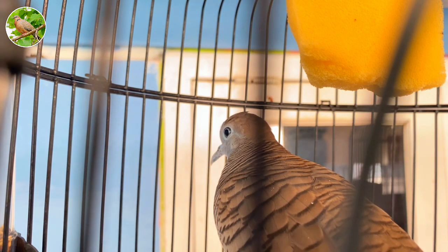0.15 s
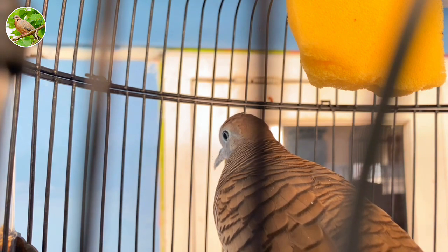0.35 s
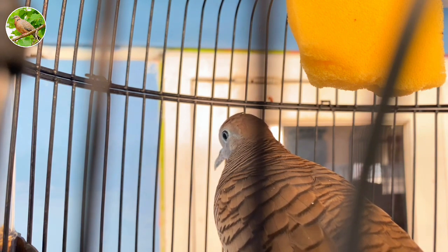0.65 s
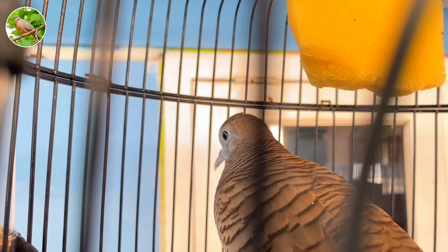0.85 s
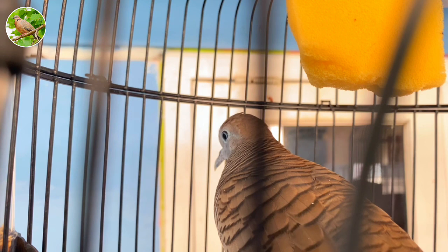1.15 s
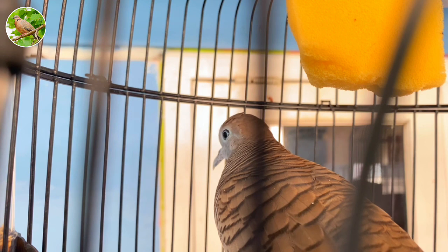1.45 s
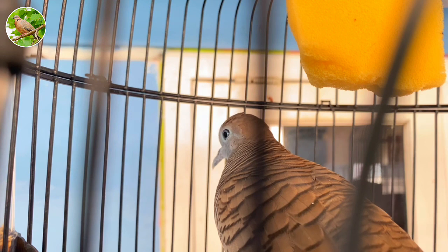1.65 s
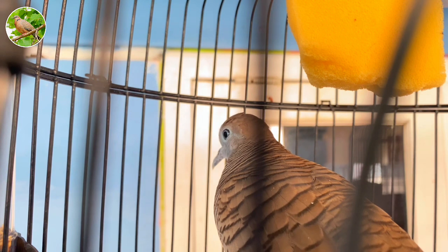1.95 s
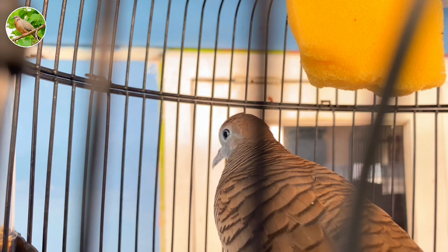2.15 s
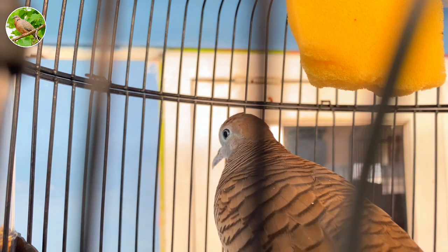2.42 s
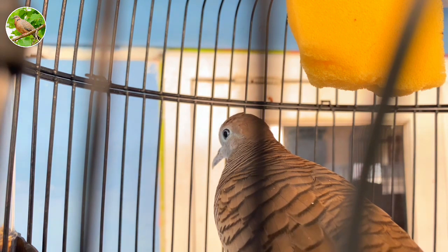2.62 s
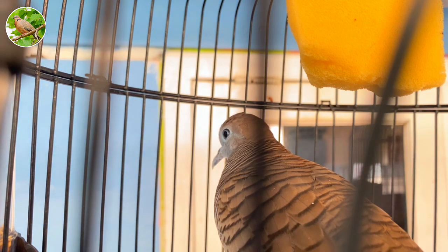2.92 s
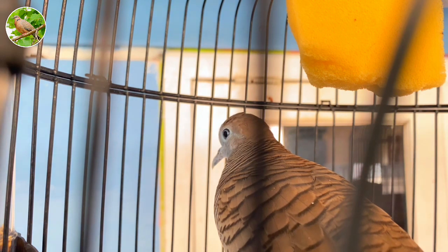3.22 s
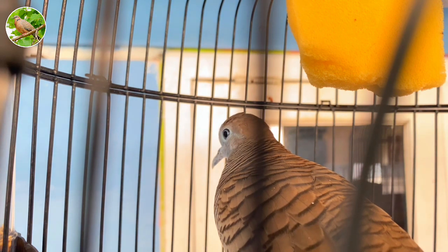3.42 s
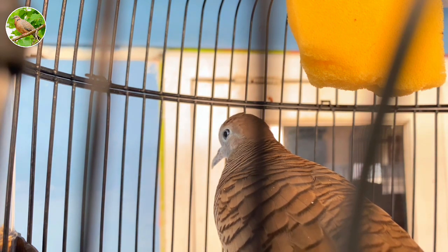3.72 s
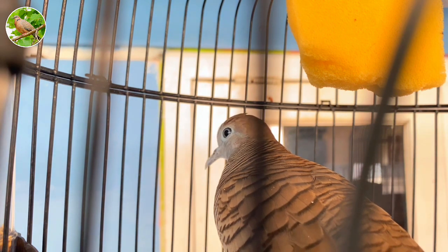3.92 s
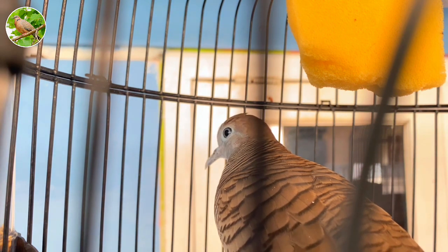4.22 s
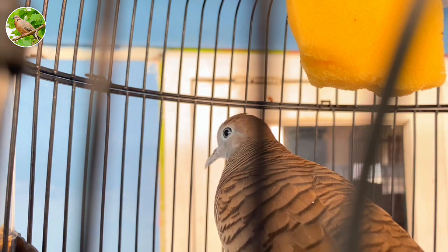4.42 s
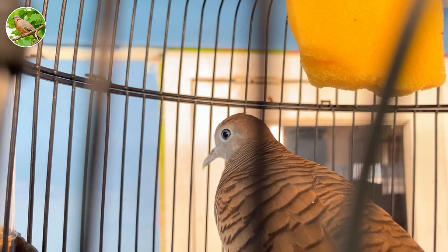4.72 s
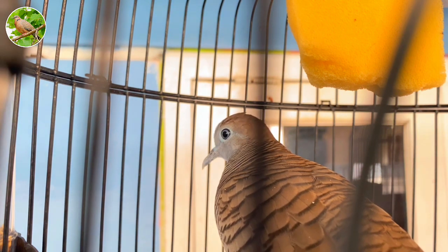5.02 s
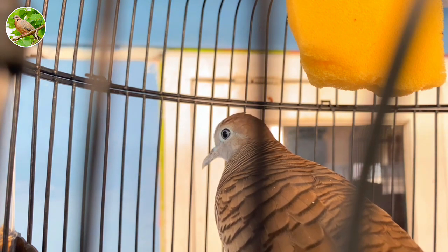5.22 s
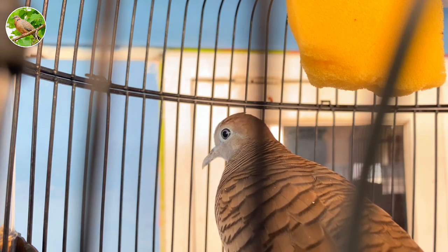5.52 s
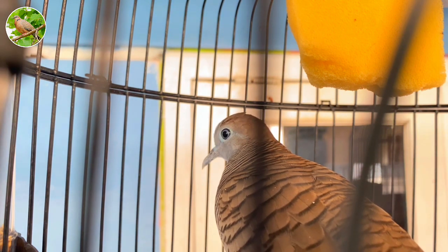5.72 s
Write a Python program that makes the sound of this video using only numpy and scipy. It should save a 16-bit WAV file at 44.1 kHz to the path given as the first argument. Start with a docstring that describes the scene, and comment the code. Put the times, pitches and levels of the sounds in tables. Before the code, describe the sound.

Low street hum surrounds two close doves. First come faint echoing far calls, then a loud, fast cooing roll slightly left. After a gap with distant pips and tiny wire ticks, a drier, quieter dove coos in front. Another pause holds a barely audible bird whistle before both coo together, the loudest peaks slightly overloaded.

```python
"""First a street hum with hiss and insects, and far doves calling; then two caged doves coo close by.
The loud dove sits left under an eave that throws its notes back; the softer one is dry and in front.
Coos are gliding near-sines whose overtones flare as the register flips; hoarse catches are throat pulses.
Far doves are rising tones mostly heard as echo, with level pips; a small bird whistles faintly.
The street is shaped noise; cage-wire ticks are ringing noise bursts and bumps are short low sines."""
import sys
import numpy as np
from scipy import signal
from scipy.fft import rfft, irfft
from scipy.io import wavfile
from scipy.ndimage import uniform_filter1d

SR = 44100
rng = np.random.default_rng(int(sys.argv[2]) if len(sys.argv) > 2 else 0)


def generate_wav(sig):
    """Save sig (samples, or channels by samples) to the path in sys.argv[1] as 16-bit PCM at SR."""
    pcm = np.round(np.clip(np.atleast_2d(sig).T, -1, 1) * 32767).astype(np.int16)
    wavfile.write(sys.argv[1], SR, pcm)


N = 258426

# Street, all round: start_s, hum_db, hiss_db, insects_db
STREET_LEVELS = [(0.0, -35, -52, -91), (0.591, -35.5, -53, -93.5), (0.88, -40, -52, -76),
                 (1.601, -35.5, -51.5, -72.5), (1.989, -36, -50.5, -66), (2.27, -36, -48.5, -70),
                 (2.69, -34.5, -50, -68), (3.31, -35, -49, -67.5), (3.74, -35.5, -49, -75),
                 (4.32, -34, -50, -71), (5.32, -35, -50, -68.5), (5.52, -39.5, -49.5, -65),
                 (5.86, -39, -52, -72)]
# Relative density of the hum and of the hiss: frequency_hz, density_db (per Hz)
HUM_SPECTRUM = [(15, -30.5), (25, -18), (35, -12), (47, -22), (70, -7.5), (95, -9), (125, 2), (150, -7),
                (183, -1.5), (215, -12.5), (300, -13.5), (400, -17.5), (660, -32), (1000, -64)]
HISS_SPECTRUM = [(290, -20), (500, -1.5), (737, -1), (1170, -4), (1310, -5.5), (1410, -7), (1530, -7),
                 (2330, -12.5), (2650, -16), (3100, -18.5), (5130, -30), (6640, -29), (9110, -42),
                 (12000, -38.5), (15500, -42.5)]
# Insect bands: centre_hz, width_hz, relative_level_db
INSECT_BANDS = [(4250, 350, -1.5), (5780, 270, -1), (6620, 1400, 3.5), (7240, 610, -0.5)]
# Stereo width of the street: frequency_hz, side_against_mid_db
STREET_WIDTH = [(60, -27.5), (300, -30), (800, -23.5), (2700, -20), (4200, -22), (7600, -20), (8600, -2.5),
                (10500, -4), (15000, -11.5)]
# Small bird far away: start_s, pitch_hz, level_db
WHISTLE_PATH = [(4.6, 4350, -90), (4.64, 4400, -70), (4.75, 4200, -76), (4.95, 4200, -75), (5.1, 4500, -72),
                (5.16, 4400, -90)]

# Far dove, before echo and distance loss: start_s, level_db, length_s
FAR_CALLS = [(0.056, -31.5, 0.052), (0.271, -32, .045), (0.49, -31.5, .045), (0.716, -31.5, 0.05),
             (1.435, -31.5, 0.038)]
FAR_LOW_HZ, FAR_RISE_HZ = 981, 388
# Still farther dove on one pitch, also heard faintly in the echo: start_s, level_db
FAR_PIPS = [(1.59, -51), (1.80, -50), (2.01, -51), (2.22, -49), (2.44, -52), (2.66, -49), (2.87, -52),
            (3.29, -53)]

# Cage wire: start_s, level_db
WIRE_TICKS = [(2.8908, -55), (3.1063, -60), (3.25, -59), (3.4047, -51), (5.1094, -65.5)]
TICK_HZ = 12000
# Low bumps: start_s, level_db, pitch_hz
LOW_BUMPS = [(1.832, -27.5, 140), (4.507, -23, 114), (5.093, -25.5, 129)]

# Coos, low register then flip up; levels at the dove, before the port gains:
# start_s, flip_after_s, length_s, low_hz, top_hz, start_level_db, flip_level_db, settled_level_db
FRONT_NOTES = [(3.5012, 0.054, 0.21, 1001, 1250, -22, -16.5, -20.5),
               (3.704, 0.02, 0.043, 937, 1086, -20.5, -18.5, -17.5),
               (3.7728, 0.0109, 0.029, 946, 976, -24, -23, -17),
               (3.848, 0.02, 0.041, 988, 1080, -28.5, -14.5, -19.5),
               (3.9422, 0.014, 0.046, 984, 1140, -24, -15, -23),
               (4.0475, 0.0154, 0.061, 980, 1165, -26, -15.5, -19.5),
               (5.3433, 0.045, 0.18, 987, 1254, -21.5, -15.5, -21.5),
               (5.533, 0.0166, 0.0407, 940.5, 1114, -24.5, -22, -19),
               (5.6, 0.012, 0.032, 941, 984, -24.5, -23.5, -17),
               (5.6782, 0.015, 0.051, 944, 1038, -32, -14.5, -33),
               (5.7731, 0.017, 0.0495, 979, 1127, -32, -12.5, -14.5)]
LEFT_NOTES = [(0.7545, 0.012, 0.074, 976, 1244, -12.5, -7.5, -13.5),
              (0.8258, 0.0089, 0.052, 1082, 1218, -23, -10, -9),
              (0.8738, 0.008, 0.05, 1114, 1214, -20, -9.5, -11),
              (0.9318, 0.005, 0.044, 1036, 1182, -14.5, -7, -13),
              (1.0062, 0.0068, 0.042, 985, 1152, -13, -7.5, -12.5),
              (1.0979, 0.0091, 0.052, 954, 1176, -19.5, -6.5, -14.5),
              (1.2115, 0.0095, 0.17, 949, 1218, -12.5, -8, -17),
              (5.4395, 0.024, 0.075, 987, 1255, -9.5, -9, -21.5),
              (5.5157, 0.0057, 0.0426, 1010, 1237, -14, -9, -14.5),
              (5.5608, 0.0077, 0.049, 1071, 1222, -18.5, -9, -11.5),
              (5.6203, 0.0056, 0.042, 995, 1176, -10, -6, -15),
              (5.6932, 0.0071, 0.04, 959, 1155, -15.5, -6.5, -15),
              (5.7855, 0.009, 0.051, 939.5, 1182, -18.5, -7, -15)]
# Hoarse catches before the voice locks in, likewise: start_s, length_s, level_db
FRONT_CATCHES = [(3.484, .016, -28), (3.765, .007, -32), (3.840, 0.0074, -31.5), (3.933, 0.0098, -29),
                 (4.041, 0.0066, -29.5), (5.327, 0.017, -28.5)]
LEFT_CATCHES = [(.7045, .001, -21), (0.7403, .016, -13.5), (0.995, .004, -23), (1.091, .004, -29),
                (1.202, .004, -24), (5.422, .018, -16), (5.773, .004, -23)]
# Overtones against the fundamental, before any dulling of short notes:
# multiple, before_flip_db, at_flip_db, settled_db
FRONT_OVERTONES = [(2, -41, -25, -34.5), (3, -45, -31.5, -45), (4, -51.5, -34.5, -57),
                   (5, -53.5, -42.5, -63), (6, -54.5, -36.5, -65.5), (7, -60, -51, -60),
                   (8, -53.5, -62.5, -79), (9, -79, -50, -74.5), (10, -89.5, -50.5, -79)]
LEFT_OVERTONES = [(2, -38.5, -27.5, -56.5), (3, -54, -35, -60.5), (4, -65, -48, -72.5), (5, -76, -61, -79)]
# Pitch arch after the flip, one row for short notes and one for long:
# top_place (0-1), sink_hz, late_level_db, end_level_db, fall_s, quaver_hz
FRONT_ARCH = [(0.28, 165, -20.3, -27, 0.007, 3), (0.15, 130, -19.5, -21, 0.0053, 41.5)]
LEFT_ARCH = [(.33, 225, -15, -12.5, 0.0088, 0.01), (.14, 190, -10, -15, 0.016, 0.0027)]
# Low register: scoop_hz, patience_s (later flips jump), jump_hz_per_s of further delay
FRONT_LOW = (75, .016, 5000)
LEFT_LOW = (57, .009, 7000)
LONG_S = .1  # longer notes count as long
SLUR_S = .004  # a note this close behind the last takes up its pitch

# The phone's body shades the right microphone port: frequency_hz, gain_db
BODY_SHADE = [(1300, 0), (1900, -7), (3300, -6), (5000, -5.5), (8000, 0)]
EDGE_HZ = 15550  # upper band limit


def amp(db):
    """Decibels to amplitude."""
    return 10 ** (np.asarray(db) / 20)


def evened(x):
    """Scales to an RMS of 1."""
    return x / np.sqrt(np.mean(x ** 2) + 1e-20)


def read(points, hz):
    """Reads a table of frequency and dB, interpolated over log frequency."""
    f, value = np.transpose(points)
    return np.interp(np.log(hz + 1), np.log(f + 1), value)


def add(mix, s, sound):
    """Adds a sound at s seconds, cut off at the end of the mix."""
    part = mix[round(s * SR):][:len(sound)]
    part += sound[:len(part)]


def ring(x, hz, width):
    """A resonance of gain 1 at its centre."""
    return signal.lfilter(*signal.iirpeak(hz, hz / width, SR), x)


def flutter(depth_db, count):
    """A gain that wanders at random over about count samples."""
    wander = rng.standard_normal(N)
    for _ in range(2):
        wander = uniform_filter1d(wander, size=count)
    return amp(depth_db * evened(wander))


def noise(spectrum_db, size, patchy_db, count):
    """Random short-time spectra with level patches count frames long; mid and side by the width table."""
    frames, hz = 4 * N // size + 5, np.fft.rfftfreq(size, 1 / SR)
    a, b, c, d, patches = rng.standard_normal((frames, len(hz), 5)).T
    patches = uniform_filter1d(patches, size=7, axis=0)  # across frequency
    patches = evened(uniform_filter1d(patches, size=count, axis=1))  # across time
    mid = a + 1j * b
    side = (c + 1j * d) * amp(read(STREET_WIDTH, hz))[:, None]
    gain = amp(spectrum_db(hz)[:, None] + patchy_db * patches)
    spectra = np.array([mid + side, mid - side]) * gain
    sound = signal.istft(spectra, nperseg=size, noverlap=3 * size // 4)[1]
    return evened(sound[:, :N])


def insect_spectrum_db(hz):
    """Sums the power of steep-sided insect bands."""
    power = sum(amp(2 * db) / (1 + (2 * (hz - f) / w) ** 4) for f, w, db in INSECT_BANDS)
    return 10 * np.log10(power)


def street():
    """Lumpy hum of distant engines, broad hiss and bands of insects, all from shaped noise."""
    s, *levels = np.transpose(STREET_LEVELS)
    hum_db, hiss_db, insect_db = (np.interp(np.arange(N) / SR, s, c) for c in levels)
    hum = noise(lambda hz: read(HUM_SPECTRUM, hz), size=4096, patchy_db=1.0, count=9)
    hiss = noise(lambda hz: read(HISS_SPECTRUM, hz), size=1024, patchy_db=2.5, count=15)
    hiss = hiss * flutter(0.65, count=1500)
    insects = noise(insect_spectrum_db, size=1024, patchy_db=3.5, count=70) * flutter(1.5, count=1500)
    hum_lean = amp([[.55], [-.55]])  # the hum leans a little to the left
    return amp(hum_db) * hum * hum_lean + amp(hiss_db) * hiss + amp(insect_db) * insects


def whistle():
    """A small bird far away: one faint sine of wavering pitch and level."""
    s, hz, db = np.transpose(WHISTLE_PATH)
    t = np.arange(N) / SR
    turns = np.cumsum(np.interp(t, s, hz) * flutter(.12, count=300)) / SR
    level = amp(np.interp(t, s, db, -200, -200)) * flutter(4.0, count=400)
    return level * np.sin(2 * np.pi * turns)


def echo(x, t60, after):
    """Sparse taps of random sign that die away by 60 dB in t60 seconds, other taps for each ear."""
    t = np.arange(SR // 2) / SR
    signs = rng.choice([-1., 1.], (2, len(t)))
    kept = rng.random((2, len(t))) < .05
    taps = signs * kept * amp(-60 * t / t60) * (t > after)
    return signal.fftconvolve(x[None], taps / np.linalg.norm(taps[0]), axes=1)[:, :N]


def far_doves():
    """Rising sine calls heard mostly as echo, and faint level pips."""
    calls, pips = np.zeros(N), np.zeros(N)
    for s, db, length in FAR_CALLS:
        u = np.arange(0, 1, 1 / (length * SR))
        climb = np.interp(u, [0, .7, 1], [0, 1.08, .45])  # climbs, then drops back
        turns = np.cumsum(FAR_LOW_HZ + FAR_RISE_HZ * climb) / SR
        add(calls, s, amp(db) * signal.windows.tukey(len(u), .3) * np.sin(2 * np.pi * turns))
    t = np.arange(0, .08, 1 / SR)
    for s, db in FAR_PIPS:
        add(pips, s, amp(db) * np.sqrt(2) * np.hanning(len(t)) * np.sin(2 * np.pi * 1290 * t))
    wet = echo(calls + .5 * pips, .22, .001)
    wet *= np.linalg.norm(calls) / np.linalg.norm(wet[0])
    return amp(-14) * calls + pips + wet[0] + .15 * wet  # echo mostly shared by both ears


def knocks():
    """Wire ticks ring for a millisecond or two; bumps are a few soft low cycles."""
    out, t = np.zeros(N), np.arange(0, .05, 1 / SR)
    for s, db in WIRE_TICKS:
        wire = evened(ring(rng.standard_normal(len(t)), TICK_HZ, 4000))
        add(out, s, amp(db) * np.exp(-t / 0.0014) * wire)
    for s, db, hz in LOW_BUMPS:
        add(out, s, amp(db) * np.sin(np.pi * t / .05) ** 2 * np.sin(2 * np.pi * hz * t))
    return out


def shapes(notes, low_rule, arch):
    """Fills in each note's pitch and level points from the dove's habits."""
    scoop_hz, patience, jump = low_rule
    last_s, last_hz = -1, 0
    for s, flip, length, low, top, *levels_db in notes:
        place, sink_hz, late_db, end_db, fall, quaver = arch[int(length > LONG_S)]
        start = last_hz if s - last_s < SLUR_S else low - scoop_hz
        high = min(low + jump * max(flip - patience, 0), top)  # pitch just after the flip
        last_s, last_hz = s + length, top - sink_hz
        yield s, flip, length, start, low, high, top, place, last_hz, *levels_db, late_db, end_db, fall, quaver


def note(row, tones, fade, dull_db):
    """A near-sine from the closed beak; overtones flare at the flip of register and fade."""
    s, flip, length, start, low, high, top, place, end, *levels_db, fall, quaver = row
    t = np.arange(0, length, 1 / SR)
    after, short = length - flip, length <= LONG_S
    u = np.clip((t - flip) / after, 0, 1)
    rise = (top - high) * np.clip(1 - u / place, 0, 1) ** 2
    sink = (top - end) * np.clip((u - place) / (1 - place), 0, 1) ** (2 if short else 1.2)
    wobble = quaver * u * np.cos(2 * np.pi * 27 * (t - length) + 2.16)  # grows as the breath runs out
    hz = np.where(t < flip, start + (low - start) * t / flip, top - rise - sink + wobble)
    hz = uniform_filter1d(hz, size=130, mode="nearest")
    turns = 2 * np.pi * np.cumsum(hz) / SR

    times = [0, flip, flip + min(.008, .3 * after), flip + .6 * after, length]
    edges = np.clip(t / .004, 0, 1) * np.clip((length - t) / fall, 0, 1)
    level = np.sqrt(2) * amp(np.interp(t, times, levels_db)) * edges

    flare = np.exp(-abs(t - flip - .003) / np.where(t < flip + .003, .004, fade))
    flare = flare * np.clip((top - low - 50) / 150, .15, 1)  # a wider flip flares more
    voice = np.sin(turns)
    for k, (_, before_db, flip_db, settled_db) in enumerate(tones, 2):
        calm_db = np.where(t < flip, before_db, settled_db)
        dulling = short * dull_db * (k - 1) * flare  # short notes lose more of each higher overtone
        tone_db = flare * flip_db + (1 - flare) * calm_db - dulling
        voice = voice + amp(tone_db) * np.sin(k * turns)
    return s, level * voice


def dove(notes, catches, tones, fade, dull_db):
    """Notes, and uneven single pulses, tending to grow, that ring the puffed throat."""
    out, t = np.zeros(N), np.arange(0, .012, 1 / SR)
    for row in notes:
        add(out, *note(row, tones, fade, dull_db))
    swell = (t / .0014) ** 2 * np.exp(2 - 2 * t / .0014)
    for s, length, db in catches:
        for at in np.arange(0, length, .0033):
            late, size, hz = rng.uniform([0, .8, 750], [.001, 1.1, 1250])
            strength = amp(db) * np.sqrt(2) * size * (.6 + .5 * at / length)
            add(out, s + at + late, strength * swell * np.sin(2 * np.pi * hz * t))
    return out


def front_dove():
    """The softer dove, dry and central; its overtones linger after each flip."""
    notes = shapes(FRONT_NOTES, FRONT_LOW, FRONT_ARCH)
    return dove(notes, FRONT_CATCHES, FRONT_OVERTONES, fade=.065, dull_db=5)


def left_dove():
    """The loud dove: its sound at the two ports, with the eave's scattered echo."""
    notes = shapes(LEFT_NOTES, LEFT_LOW, LEFT_ARCH)
    left = dove(notes, LEFT_CATCHES, LEFT_OVERTONES, fade=.006, dull_db=0)
    shaded = irfft(rfft(left) * amp(read(BODY_SHADE, np.fft.rfftfreq(N, 1 / SR))), N)
    # two samples later at the left port
    ports = np.array([amp(2.18) * np.roll(left, 2), amp(0.1) * shaded])
    eave = echo(left, .3, .02)
    return ports + amp(-18) * (eave[0] + 0.13 * eave)


def scene():
    """Sums the background and both near doves at the two microphone ports."""
    background = street() + whistle() + far_doves() + knocks()
    return background + front_dove() + left_dove()


def record(dry):
    """The microphone input overloads at the loudest peaks; then the band limit."""
    clipped = np.clip(dry, -.97, .97)
    band = signal.firwin(511, EDGE_HZ, window=("kaiser", 9), fs=SR)
    return signal.oaconvolve(clipped, band[None], "same")


dry = scene()
out = record(dry)
generate_wav(out)
```